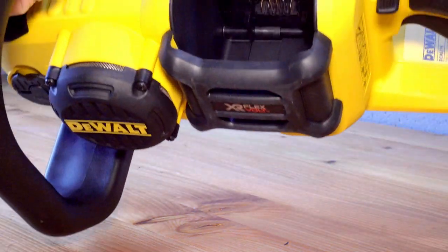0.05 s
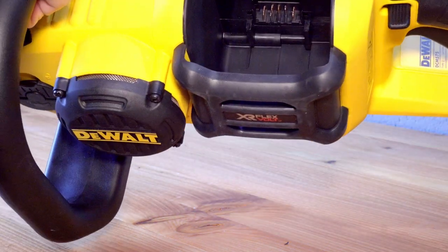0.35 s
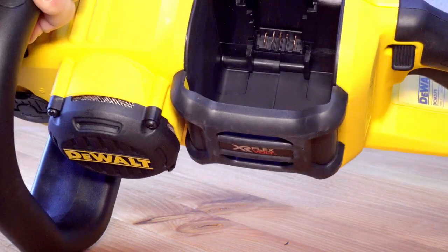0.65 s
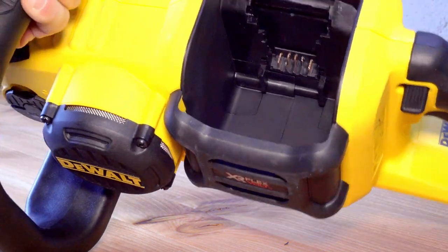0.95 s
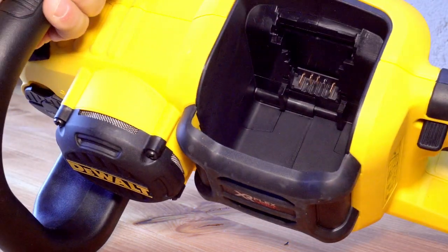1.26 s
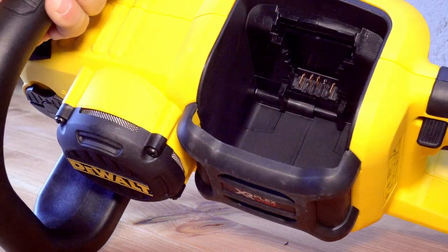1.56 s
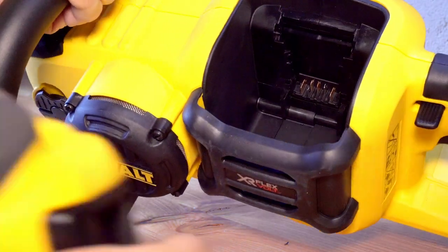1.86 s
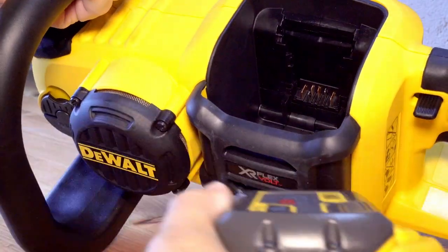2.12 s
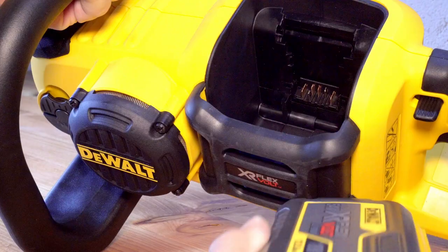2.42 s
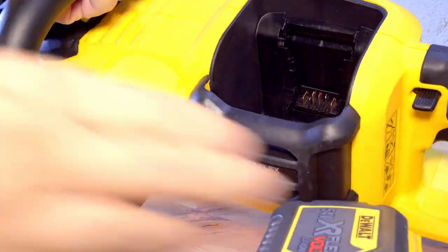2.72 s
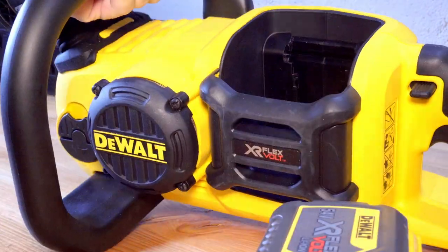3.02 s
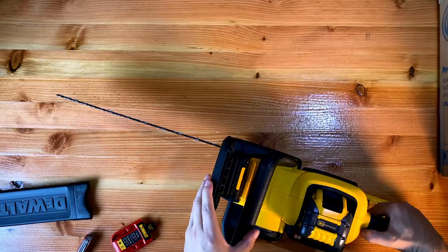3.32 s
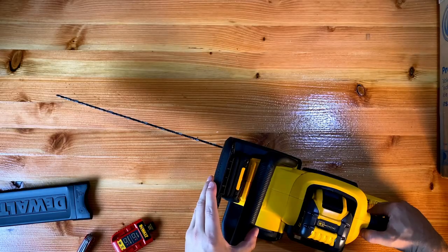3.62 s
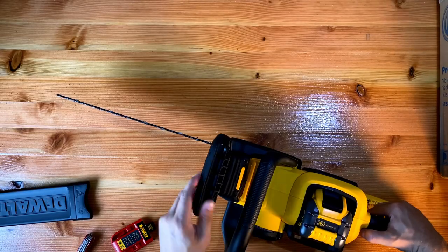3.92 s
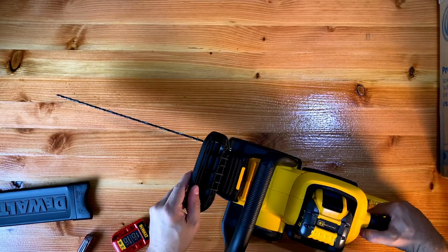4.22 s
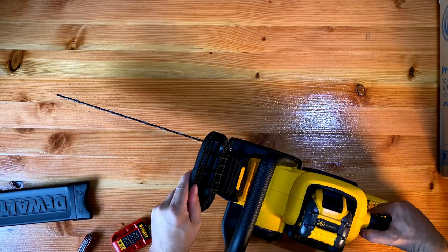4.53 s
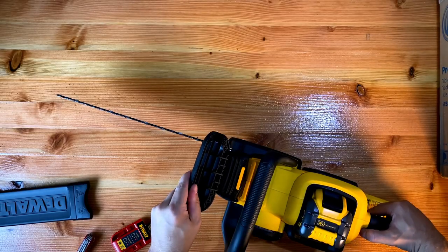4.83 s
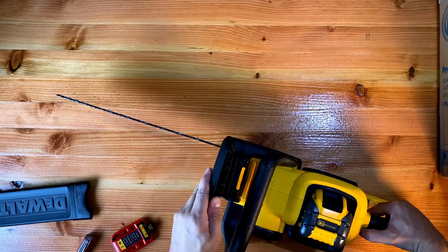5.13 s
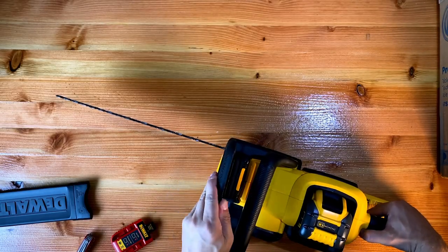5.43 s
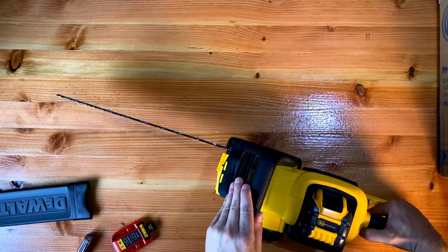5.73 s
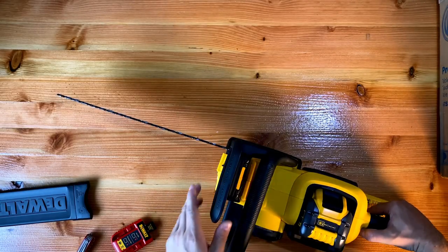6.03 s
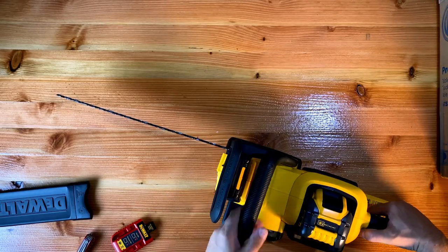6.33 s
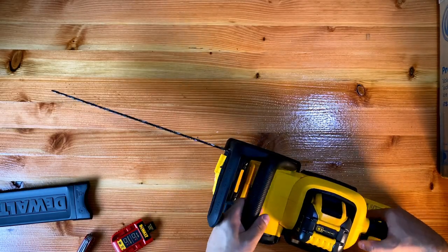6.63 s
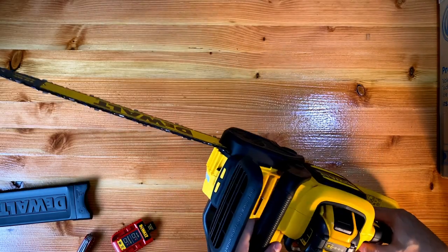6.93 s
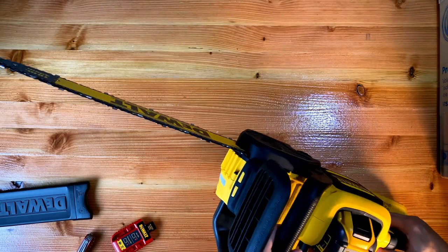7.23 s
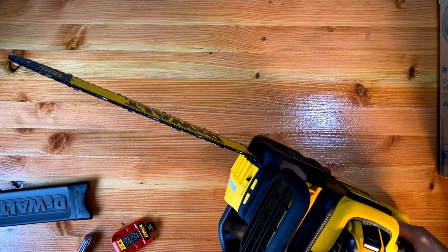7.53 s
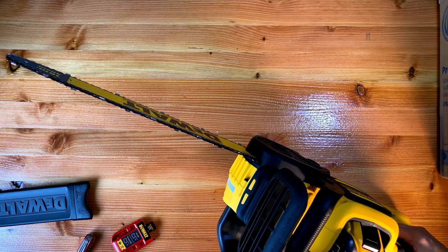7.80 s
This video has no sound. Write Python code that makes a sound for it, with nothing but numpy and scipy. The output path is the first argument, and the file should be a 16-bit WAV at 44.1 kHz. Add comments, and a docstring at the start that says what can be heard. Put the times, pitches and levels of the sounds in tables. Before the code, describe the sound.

Hollow knocks and scrapes of a plastic tool on wood, followed by faint clicks, soft bumps and a sharp chain brake snap.

```python
"""A small live room with a wooden table. Close to a hissy microphone, a cordless chainsaw, motor off, is
tilted and slid about and its battery is set down; each knock rings both the object and the table.
Then, from overhead through a quieter microphone, a hand works the plastic guard: small clicks and one
hard snap of the chain brake. Soft bumps make the table boom in both positions."""
import sys
import numpy as np
from scipy import signal
from scipy.fft import rfft, irfft, next_fast_len
from scipy.io import wavfile

SR = 44100
rng = np.random.default_rng(int(sys.argv[2]) if len(sys.argv) > 2 else 0)


def generate_wav(signal):
    """Clip the signal to [-1, 1] and save it as 16-bit WAV at the path in sys.argv[1]."""
    frames = np.transpose(np.atleast_2d(signal))
    scaled = np.clip(frames, -1, 1) * 32767
    pcm = np.round(scaled).astype(np.int16)
    wavfile.write(sys.argv[1], SR, pcm)


N = 351036
TIME = np.arange(N) / SR
RING = np.arange(SR) / SR  # the seconds after a blow
BAND_HZ = 88 * 2 ** (np.arange(16) / 2)

# Noise floor at each microphone. Each row: frequency in Hz, level in dB.
CLOSE_FLOOR = [(24, -44), (40, -8), (137, -11.5), (176, -12), (243, -10), (329, -16), (402, -8), (697, -23),
               (990, -22), (1370, -27.5), (16000, -41)]
OVERHEAD_FLOOR = [(15, -41.5), (25, -23.5), (59, 3), (100, -14.5), (141, -11), (190, -23), (235, -14.5),
                  (310, -26), (500, -29.5), (640, -27), (950, -29), (1480, -41.5), (2600, -48.5),
                  (16000, -64)]
# Stereo width at each microphone. Each row: frequency in Hz, side against middle in dB.
CLOSE_WIDTH = [(100, -38.5), (380, -10), (750, -7), (2400, -3), (8000, -1)]
OVERHEAD_WIDTH = [(60, -2), (200, -8.5), (450, 2.5), (8000, -0.5)]
# Reflections at each microphone. Each row: frequency in Hz, strength in dB.
CLOSE_ROOM = [(150, 1.5), (500, -0.5), (1000, -3.5), (3000, 1), (7000, -9.5), (13000, -7)]
OVERHEAD_ROOM = [(250, 0.5), (700, 0), (1200, -6), (2500, -5.5), (5000, -7.5), (8000, -4), (13000, -17.5)]
# Decay of the room. Each row: frequency in Hz, t60 in seconds.
ROOM_T60 = [(60, 0.94), (200, 0.43), (500, 0.42), (1200, 0.45), (3000, 0.49), (6000, .4), (13000, 0.35)]
# Skin brushing the housing (the long stroke is the steadying hand) and the saw shoved over the wood.
# Each row: start in seconds, length in seconds, level in dB.
SKIN_STROKES = [(0, 2.72, -57), (0, 0.083, -51), (.22, .23, -52.5), (.79, 0.3, -52.5), (1.66, 0.49, -56.5),
                (2.25, 0.12, -45), (2.77, 0.13, -56), (3.865, 0.023, -63.5), (3.99, 0.038, -62),
                (5.06, 0.019, -62.5), (6.335, .16, -65.5)]
SHOVES = [(0, 0.05, -44.5), (.2, 0.028, -29), (.785, 0.072, -38), (1.05, 0.036, -44), (1.62, 0.16, -50),
          (2.335, 0.012, -44.5), (2.52, 0.031, -49), (2.81, 0.042, -65)]
# At 5.644 s a brief hiss near 3 kHz swells just before the brake snap; the rows near 3.1 kHz from # 2.25 to 2.6
# s are the battery's case ringing as it is set down, the first its contact click; the other # rows are plastic
# chafing. Each row: start and length in seconds, pitch in Hz, width in octaves, level in dB.
HISSES = [(1.607, 0.075, 2530, 0.16, -54.5), (1.715, 0.036, 3040, 0.28, -37),
          (1.72, 0.33, 2100, 0.12, -59.5), (2.254, 0.0056, 3080, 0.023, -21),
          (2.276, 0.048, 3080, 0.078, -44), (2.42, 0.17, 3140, .078, -53.5),
          (4.358, 0.053, 2183, .083, -78.5), (5.575, 0.12, 1225, 0.2, -47), (5.644, .025, 3083, 0.34, -38),
          (5.996, 0.026, 1120, 0.048, -40.5), (6.816, 0.2, 2500, .21, -65.5),
          (6.951, 0.28, 2300, 0.22, -80.5), (7.662, 0.071, 1840, 0.18, -59)]
# Soft bumps of hand and saw. Each row: start in seconds, pitch in Hz, level in dB, t60 in seconds.
BUMPS = [(0.878, 53.6, -41.5, 0.43), (1.041, 58, -46, 0.3), (1.3, 55.6, -38.5, 0.33),
         (1.821, 102.6, -47, 0.75), (3.249, 63, -43.5, 0.85), (3.355, 66.1, -40, 0.45),
         (3.469, 58, -49, 0.63), (3.852, 59.8, -38, 0.21), (4.068, 60.6, -39.5, 0.68),
         (5.188, 65.8, -43.5, 0.31), (5.235, 107.3, -45.5, 0.3), (5.307, 62.3, -43, 0.29),
         (5.718, 61.8, -40.5, 1), (6.014, 65.7, -43, 0.98), (6.288, 63.8, -30, 0.2),
         (6.553, 63.9, -49.5, 1)]
# Partials of a bump. Each row: multiple of the pitch, level in dB.
BOOM_PARTIALS = [(1.001, 4), (1.622, -10.5), (2.098, -23.5)]
# The saw knocking on the wood; the battery set down and tipped over.
# Each row: start in seconds, level in dB, tilt in dB per octave, table thump in dB.
SAW_KNOCKS = [(.001, -32, -3.5, -45.5), (.066, -36, -7.5, -45), (.646, -28.5, -6, -17.5),
              (.669, -42.5, -0.5, -28), (.785, -42, -3, -28.5), (1.133, -22.5, -1.57, -32),
              (1.150, -22.5, -2, -33), (1.187, -23.5, -5.5, -30)]
BATTERY_KNOCKS = [(2.259, -18, -4.5, -26.5), (2.302, -22, -5.5, -31), (2.435, -31, -10.5, -29),
                  (2.488, -24.5, -12.5, -28.5), (2.561, -12.5, -6.5, -31.5), (2.580, -14.5, -10, -36.5),
                  (2.603, -12, -11.5, -36), (3.178, -52.5, -3.5, -48)]
# Plastic clicks, hard catches bright and soft nudges dull; the loudest are the chain brake. Each row:
# start in seconds, level in dB, tilt in dB per octave, body thud in dB, left over right in dB.
CLICKS = [(1.719, -62, 5, -58.5, -0.5), (1.732, -51.5, -4, -52, 2), (3.361, -58, -11.5, -64, 4),
          (3.434, -58.5, 0, -93, 3), (3.906, -54, -0.8, -77, 4.5), (4.031, -57.5, -5, -56, 4.5),
          (5.096, -60, -3, -73.5, 6.5), (5.108, -52.5, -6.5, -72, 3), (5.178, -47, -12.5, -49.5, 4),
          (5.277, -58, -0.5, -75, 4), (5.574, -40, -24.5, -62, 4), (5.626, -48, -6.5, -49.5, 4),
          (5.6632, -10.5, -5.5, -51, 6), (5.6657, -11, -14.5, -35.5, 1.5), (5.668, -25.5, -1, -39.5, 1),
          (5.968, -48, -8.5, -55, 2), (6.004, -48.5, -7.5, -43.5, 6.5), (6.556, -43.5, -7, -45.5, 4),
          (6.877, -44.5, -12.5, -52.5, 7.5), (6.943, -57, -9.5, -57.5, 4), (7.671, -48, -16, -63.5, 4),
          (7.705, -55, -15, -54.5, 4.5)]
# A small steel spring pings with some clicks. Each row: start in seconds, level in dB.
PINGS = [(3.434, -61.5), (3.905, -70), (5.275, -58)]
# What each object rings with. Each row: frequency in Hz, level in dB, t60 in seconds.
TABLE_MODES = [(56, -6, 1.1), (67, 1.5, 0.44), (96, -1, 0.15), (114.5, 6, 0.17), (120.4, -5, 0.56),
               (134.5, -2, .55), (163, -4.5, 0.26), (200.4, 0, 0.49), (236.2, -23, 1.1), (293, 0.5, 0.18),
               (346.4, -2.5, 0.23), (394, -3.5, 0.42)]
SAW_MODES = [(271, 0, 0.3), (324, 6, .32), (512, -13.5, 0.51), (564.7, -8, 0.68), (713, -7, 0.58),
             (907, -21.5, 0.26), (1013, -10.5, .3), (1037, -14.5, 0.35), (1056, -12.5, 0.41)]
BATTERY_MODES = [(195, -3.5, 0.5), (409.2, 2, 0.21), (457, -3, 0.18), (525, -11.5, .45), (645, -13.5, 0.26),
                 (752, -5.5, 0.27), (3060, -1, 0.1213), (3134, -3, 0.11)]
HOUSING_MODES = [(1116, -4.5, .14), (1252, -5.5, 0.031), (1448, -5, .07), (1607, -10.5, 0.053),
                 (1930, 0, .07), (2276, -4, 0.044), (2730, -4.5, 0.077), (3030, -4, 0.11),
                 (5094, -9, 0.061), (7260, -2, 0.026), (10584, -7.5, .04), (9170, -11, 0.022)]
SPRING_MODES = [(3880, 4, 0.17), (7900, -8, .11), (11300, 1, 0.069)]
# Spectrum of each kind of contact. Each row: frequency in Hz, level in dB.
SKIN_COLOUR = [(200, -4), (500, -1), (1200, -1.5), (3000, -7.5), (7000, -12), (11000, -10), (15500, -11.5)]
DRAG_COLOUR = [(88, -35), (150, -8.5), (244, -15), (280, -0.5), (466, -6), (566, -4.5), (979, -3),
               (1310, -8.5), (2500, -3.5), (11900, -23.5), (16000, -28.5)]
SAW_COLOUR = [(220, -3), (480, 4.5), (1000, -1), (3500, -2.5)]
BATTERY_COLOUR = [(220, -.5), (480, 3.5), (1000, -5.5), (3500, -0.5)]
CLICK_COLOUR = [(1200, -3.5), (2000, -1), (4200, 3.5), (7800, 2.5), (13500, -4)]


def amp(db):
    """Decibels to amplitude."""
    return 10 ** (np.asarray(db) / 20)


def at(hz, points):
    """Read (Hz, value) points on a log-frequency axis."""
    f, value = np.transpose(points)
    return np.interp(np.log(hz + 1), np.log(f), value)


def add(out, start, sound):
    """Mix a sound in from its start in seconds."""
    i = int(start * SR)
    out[:, i:i + sound.shape[-1]] += sound[..., :N - i]


def unit(x):
    """Scale to rms 1."""
    return x / np.sqrt(np.mean(x ** 2, axis=-1, keepdims=True))


def stereo(pair, colour, width):
    """Colour two unrelated signals and use them as middle and side; rms 1."""
    size = next_fast_len(pair.shape[-1], True)
    hz = np.fft.rfftfreq(size, 1 / SR)
    mid, side = rfft(pair, size) * amp(at(hz, colour))
    side = side * amp(at(hz, width))
    return unit(irfft([mid + side, mid - side], size)[:, :pair.shape[-1]])


def band_noise(width):
    """Two seconds of stereo noise in half-octave bands: (band, channel, sample)."""
    white = stereo(rng.standard_normal((2, 2 * SR)), [(1, 0), (SR, 0)], width)
    hz = np.fft.rfftfreq(2 * SR, 1 / SR)
    off_centre = np.clip(2 * np.log2((hz + 1) / BAND_HZ[:, None]), -1, 1)
    return unit(irfft(rfft(white) * np.cos(np.pi / 2 * off_centre)[:, None])) / np.sqrt(2)


def fade(hz, t60, rise_s=0):
    """One decay for each frequency; lows take longer to build up."""
    hz, t60 = np.reshape(hz, (-1, 1)), np.reshape(t60, (-1, 1))
    return (1 - np.exp(-RING / (rise_s + .5 / hz))) * np.exp(-np.log(1000) * RING / t60)


def ringing(modes):
    """Frequencies and damped sines of an object's modes."""
    hz, db, t60 = np.transpose(modes)
    sign = (-1) ** np.arange(len(hz))
    return hz, (sign * amp(db))[:, None] * fade(hz, t60) * np.sin(2 * np.pi * hz[:, None] * RING)


def burst(noise, envelopes, db):
    """Countless overlapping modes or reflections: a stretch of band noise dying away."""
    i = int(rng.random() * SR)
    return np.einsum("b,bt,bct->ct", amp(db), envelopes, noise[:, :, i:i + SR])


def blow_colour(colour, level_db, tilt_db, thud_hz, thud_db):
    """Spectrum of a blow: tilted by the hardness of the contact, over a thud from its weight."""
    hz, db = np.transpose(colour)
    return [(thud_hz, thud_db), *zip(hz, level_db + db + tilt_db * np.log2(hz / hz[0]))]


def background(overhead_from_s=3.262):
    """Hiss of the close microphone, then the room's low murmur at the overhead one, leaning left."""
    close = stereo(rng.standard_normal((2, N)), CLOSE_FLOOR, CLOSE_WIDTH) * amp(-53.5)
    overhead = stereo(rng.standard_normal((2, N)), OVERHEAD_FLOOR, OVERHEAD_WIDTH) * amp(-58)
    crossfade = np.clip((TIME - overhead_from_s) / .0085, 0, 1)
    return close * (1 - crossfade) + overhead * crossfade * amp([[2.5], [-2.5]])


def reflections(sound, noise, colour):
    """One second of what the room gives back: dense reflections that linger longest in the bass."""
    white_db = 10 * np.log10(BAND_HZ * 2 * np.log(2) / SR / (SR / 100))
    decay = fade(BAND_HZ, at(BAND_HZ, ROOM_T60), rise_s=.00089)
    response = burst(noise, decay, white_db + at(BAND_HZ, colour))
    return signal.fftconvolve(sound[None, :SR // 3], response[:, :2 * SR // 3 + 1], axes=1)


def grains(n, per_s, grain_db):
    """Two dense runs of tiny impulses of uneven size."""
    impulses = (rng.random((2, n)) < per_s / SR) * rng.standard_normal((2, n))
    return impulses * amp(grain_db * rng.standard_normal(n))


def sliding(strokes, colour, attack_s, fall_db_per_s, slips_per_s, grain_db):
    """Friction, close up: each stroke is a run of tiny slips that gathers speed, holds and dies away."""
    power = 0
    for start, length, db in strokes:
        since = np.maximum(TIME - start, 0)
        rise = 1 - np.exp(-(since / attack_s) ** 2)
        fall_db = np.clip(fall_db_per_s * (since - length), 0, 200)
        power += (rise * amp(db - fall_db)) ** 2
    return stereo(grains(N, slips_per_s, grain_db), colour, CLOSE_WIDTH) * np.sqrt(power)


def hisses(skirt_db_per_octave=7):
    """Brief swells of grainy noise, each through one resonance."""
    out = np.zeros((2, N))
    octaves = np.linspace(-5, 5, 201)
    for start, length, hz, width, db in HISSES:
        n = int(length * SR)
        grit = grains(SR, per_s=3000, grain_db=3)[:, :n]
        peak_db = -10 * np.log10(1 + (octaves / width) ** 2) - skirt_db_per_octave * abs(octaves)
        hiss = stereo(grit, list(zip(hz * 2 ** octaves, peak_db)), CLOSE_WIDTH)
        add(out, start, amp(db) * hiss * np.sin(np.pi * np.arange(n) / n))
    return out


def bumps(rise_s=.017, detune=.041):
    """Slow pushes reach only the lowest modes of table and room; the grip shudders as it pushes."""
    out, noise = np.zeros((2, N)), band_noise(OVERHEAD_WIDTH)[:3]
    multiple, partial_db = np.transpose(BOOM_PARTIALS)
    shudder_db = -9 - 9 * np.log2(BAND_HZ[:3] / BAND_HZ[0])
    for start, hz, db, t60 in BUMPS:
        partial_hz = hz * multiple * (1 + detune * rng.standard_normal(len(multiple)) * (multiple > 1.2))
        sines = np.sqrt(2) * np.sin(2 * np.pi * partial_hz[:, None] * RING)
        swell = (1 - np.exp(-(RING / rise_s) ** 2)) * np.exp(-np.log(1000) * RING / t60)
        boom = swell * (amp(db + partial_db) @ sines)
        add(out, start, boom + burst(noise, [swell] * 3, db + shudder_db))
    return out


def knocks(blows, body_modes, body_colour, modes_db, crack_db, scatter_db=5):
    """Close up: each blow rings the table and the body that hits it, cracks and fills the room."""
    out, noise = np.zeros((2, N)), band_noise(CLOSE_WIDTH)
    hz, modes = ringing(TABLE_MODES + body_modes)
    crack_fade = fade(BAND_HZ, t60=.051)
    wash_fade = fade(BAND_HZ, at(BAND_HZ, ROOM_T60), rise_s=.0021)
    # in the bass the few strong modes carry the sound; the contact is too soft for the very top
    dense_db = at(BAND_HZ, [(90, -4), (250, -2), (500, 0), (720, -1.5), (1000, 2), (3800, -3.5),
                            (7500, -7.5), (14000, -13)])
    radiation = amp(-6) * hz ** 2 / (hz ** 2 + 700 ** 2)  # only higher modes radiate well
    for start, level_db, tilt_db, thump_db in blows:
        colour = blow_colour(body_colour, level_db, tilt_db, thud_hz=65, thud_db=thump_db)
        band_db = at(BAND_HZ, colour) + dense_db
        strengths = amp(at(hz, colour) + modes_db + scatter_db * rng.standard_normal(len(hz)))
        crack = burst(noise, crack_fade, band_db + crack_db)
        echo = amp(-8) * reflections(crack[0] + (strengths * radiation) @ modes, noise, CLOSE_ROOM)
        # what leaves the body in all other directions blends into a smooth wash
        wash = burst(noise, wash_fade, band_db - 5)
        add(out, start, strengths @ modes + crack + echo + wash)
    return out


def spring_pings():
    """A small steel spring rings in its few high modes."""
    out = np.zeros((2, N))
    _, modes = ringing(SPRING_MODES)
    for start, db in PINGS:
        add(out, start, amp(db) * modes.sum(axis=0))
    return out


def clicks(scatter_db=2, left_lead_s=.00074):
    """From overhead: plastic catches let go with a crack that rings the housing, then the room."""
    out, noise = np.zeros((2, N)), band_noise(OVERHEAD_WIDTH)
    hz, modes = ringing(HOUSING_MODES)
    crack_fade = fade(BAND_HZ, t60=.03)
    wash_fade = fade(BAND_HZ, at(BAND_HZ, ROOM_T60), rise_s=.002)
    housing_db = at(BAND_HZ, [(90, -7), (250, -10.5), (700, -3), (1100, -1.5), (2500, -1.5),
                              (4000, 1.5), (7500, -2.5), (11000, 5), (15000, -3)])
    for start, level_db, tilt_db, thud_db, left_db in CLICKS:
        colour = blow_colour(CLICK_COLOUR, level_db, tilt_db, thud_hz=518, thud_db=thud_db)
        band_db = at(BAND_HZ, colour) + housing_db
        contact_s = .0001 * 2 ** (-tilt_db / 5.5)  # a soft, dull nudge pushes longer
        push = 1 - np.exp(-RING / contact_s)
        crack, scattered = push * burst(noise, crack_fade, band_db + 5.5)
        strengths = amp(at(hz, colour) + scatter_db * rng.standard_normal(len(hz)))
        direct = crack + push * (strengths @ modes)
        delayed = np.interp(RING - left_lead_s, RING, direct, left=0)
        side = amp(-10) * scattered  # the table top throws the crack back from another side
        echo = amp(-11) * reflections(direct, noise, OVERHEAD_ROOM)
        wash = burst(noise, wash_fade, band_db + at(BAND_HZ, OVERHEAD_ROOM) - 4)
        pan = amp([[left_db / 2], [-left_db / 2]])
        add(out, start, pan * (np.array([direct + side, delayed - side]) + echo + wash))
    return out


def scene():
    """Knocks, clicks, brief hisses, bumps and friction over the noise floor."""
    saw = knocks(SAW_KNOCKS, SAW_MODES, SAW_COLOUR, modes_db=-2, crack_db=5)
    battery = knocks(BATTERY_KNOCKS, BATTERY_MODES, BATTERY_COLOUR, modes_db=-3, crack_db=2)
    drag = sliding(SHOVES, DRAG_COLOUR, attack_s=.04, fall_db_per_s=127.5,
                   slips_per_s=12000, grain_db=3)
    skin = sliding(SKIN_STROKES, SKIN_COLOUR, attack_s=.025, fall_db_per_s=245,
                   slips_per_s=30000, grain_db=1.5)
    return saw + battery + clicks() + spring_pings() + hisses() + bumps() + drag + skin + background()


def record(dry):
    """The recorder rounds the highest peaks and cuts the top above 15.9 kHz."""
    rounded = dry / (1 + (dry / .9) ** 4) ** .25
    return signal.sosfilt(signal.ellip(10, .2, 70, 15900, fs=SR, output="sos"), rounded)


dry = scene()
out = record(dry)
generate_wav(out)
```